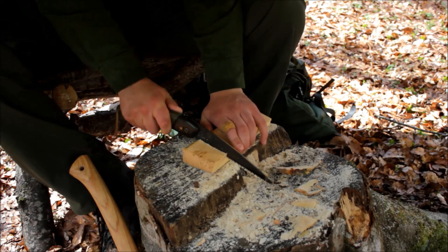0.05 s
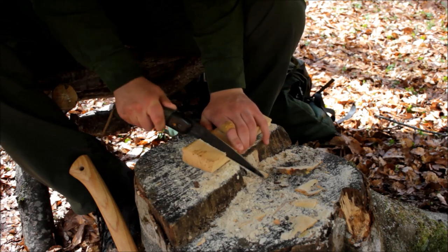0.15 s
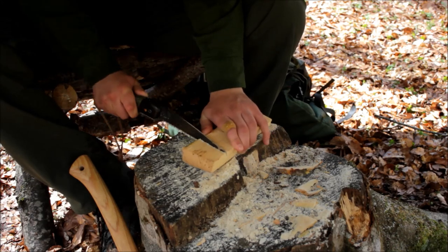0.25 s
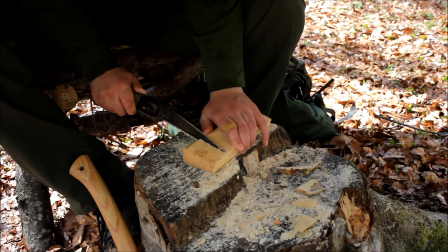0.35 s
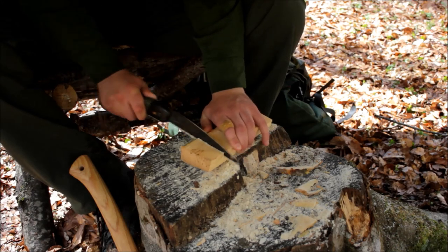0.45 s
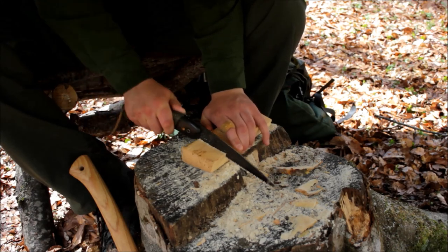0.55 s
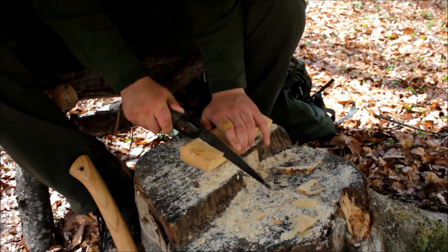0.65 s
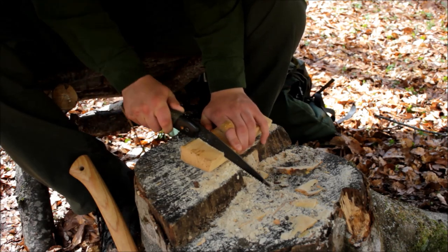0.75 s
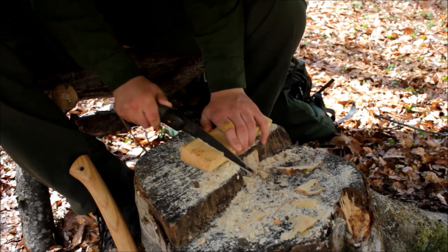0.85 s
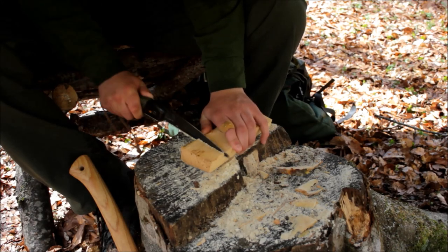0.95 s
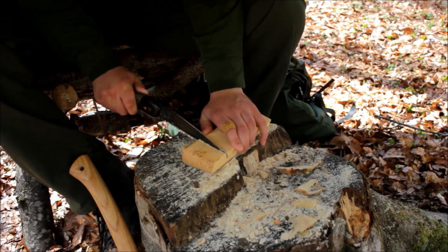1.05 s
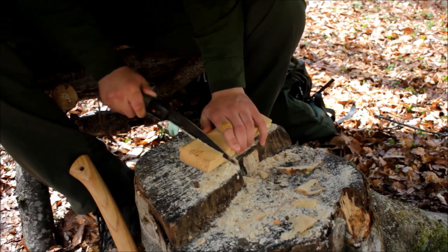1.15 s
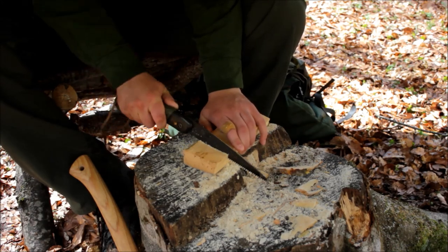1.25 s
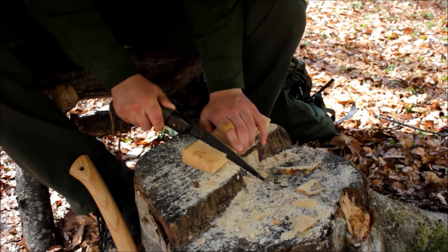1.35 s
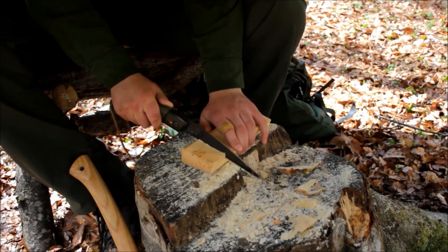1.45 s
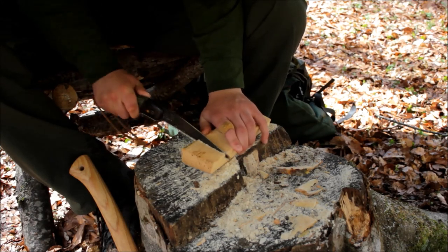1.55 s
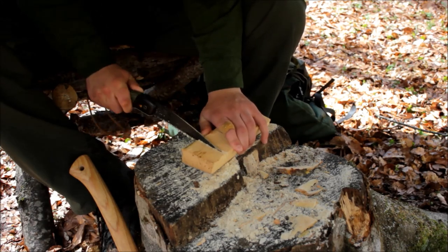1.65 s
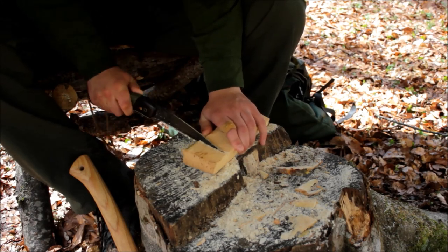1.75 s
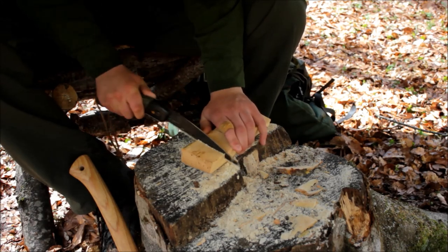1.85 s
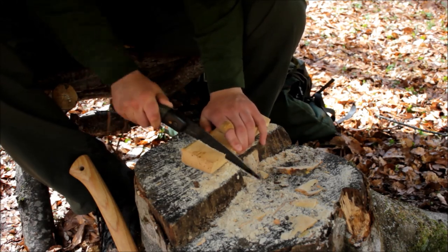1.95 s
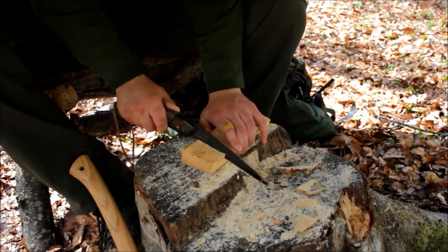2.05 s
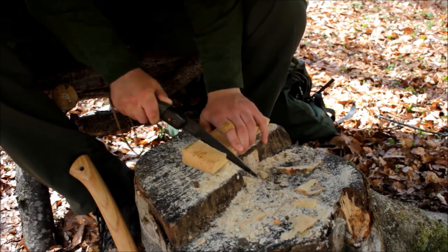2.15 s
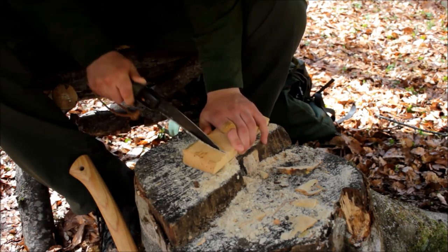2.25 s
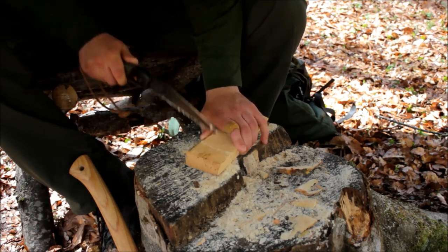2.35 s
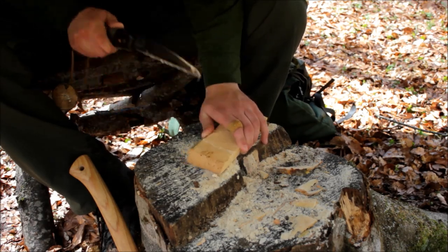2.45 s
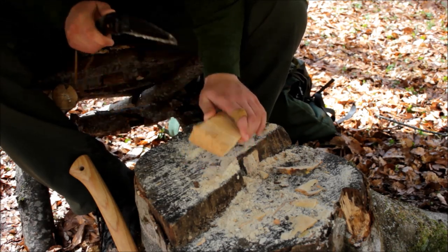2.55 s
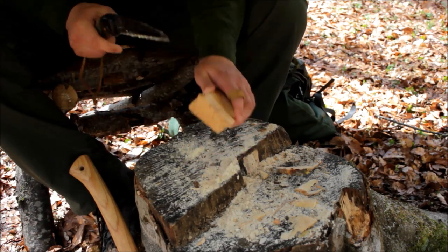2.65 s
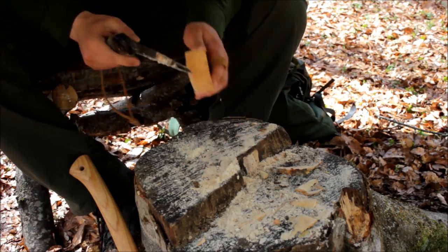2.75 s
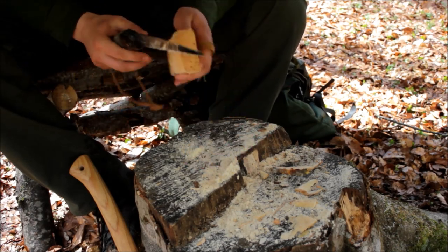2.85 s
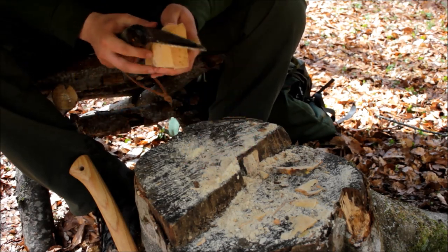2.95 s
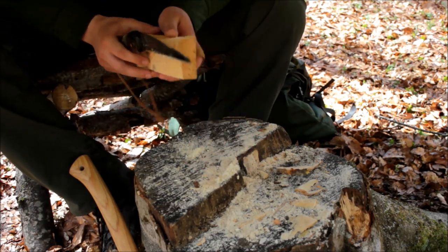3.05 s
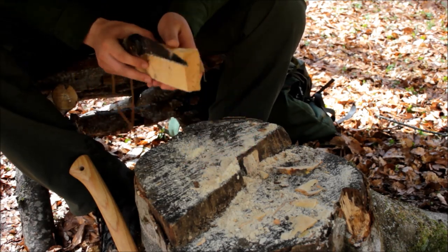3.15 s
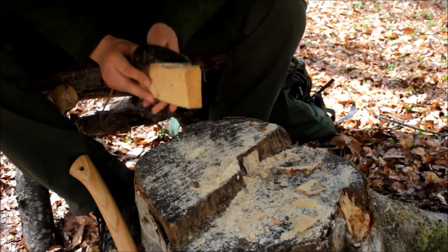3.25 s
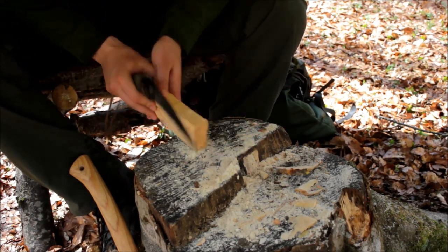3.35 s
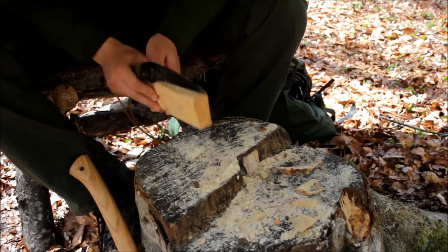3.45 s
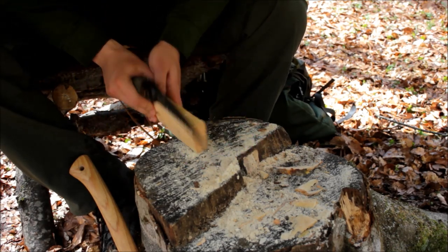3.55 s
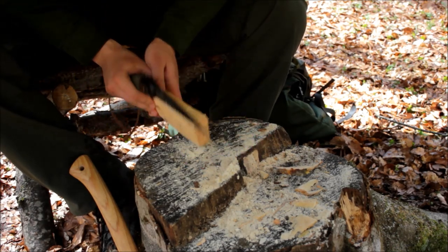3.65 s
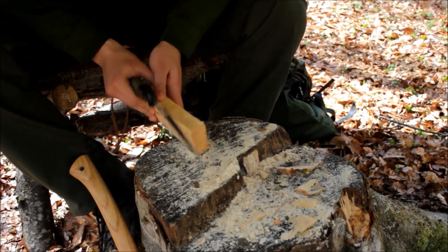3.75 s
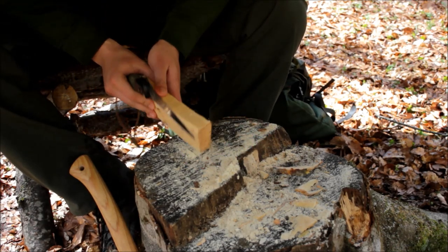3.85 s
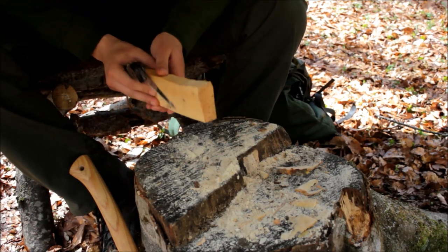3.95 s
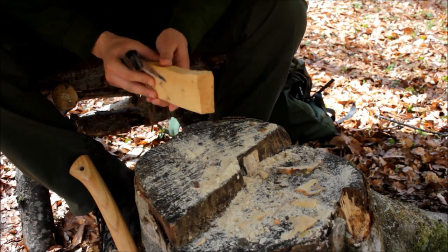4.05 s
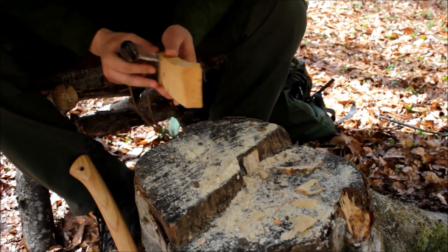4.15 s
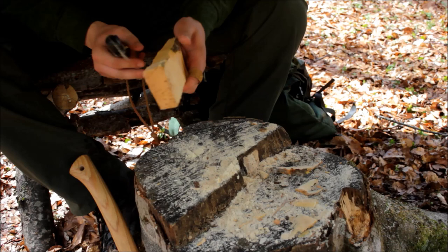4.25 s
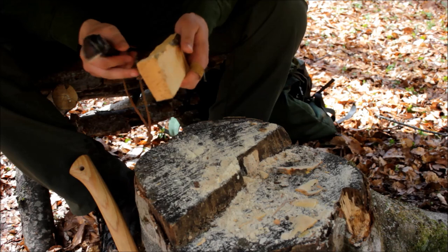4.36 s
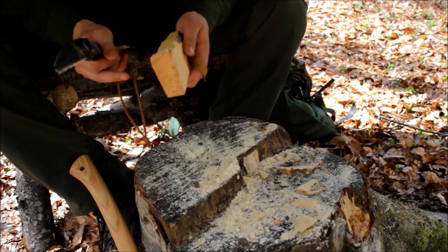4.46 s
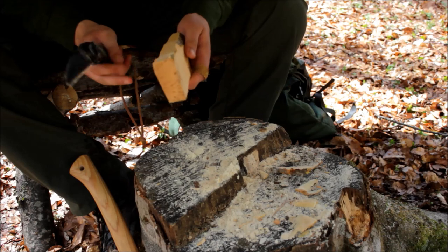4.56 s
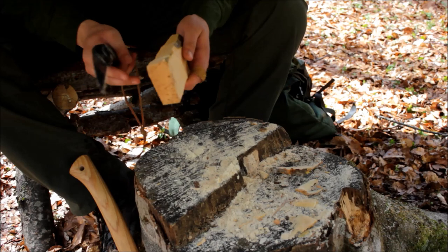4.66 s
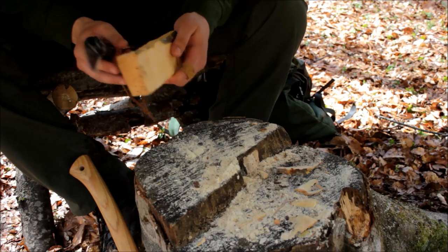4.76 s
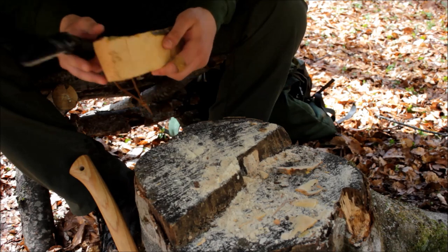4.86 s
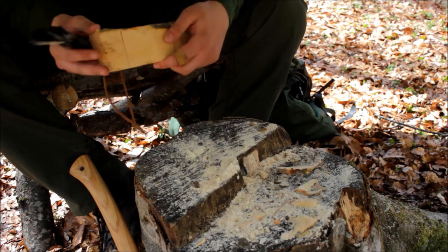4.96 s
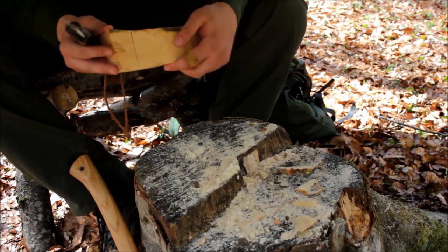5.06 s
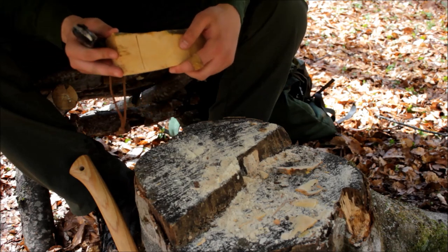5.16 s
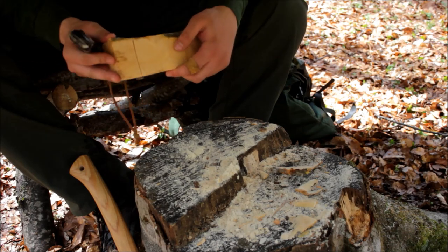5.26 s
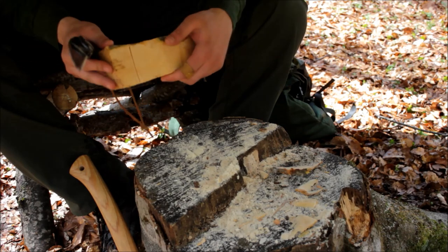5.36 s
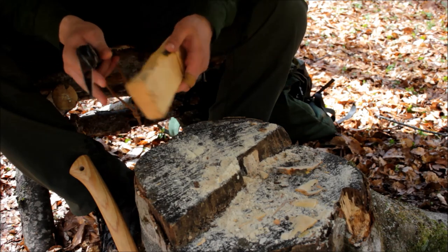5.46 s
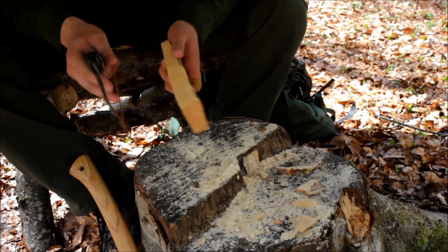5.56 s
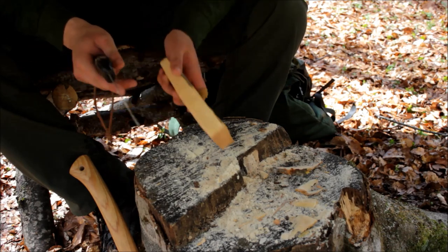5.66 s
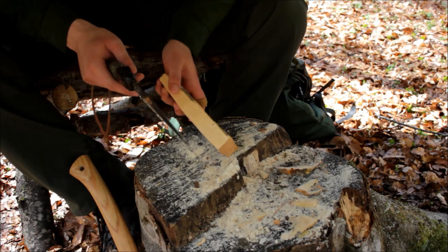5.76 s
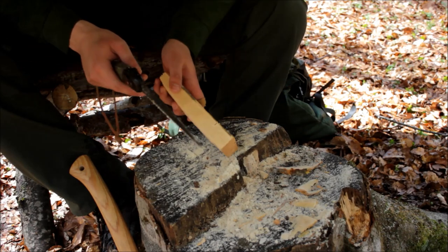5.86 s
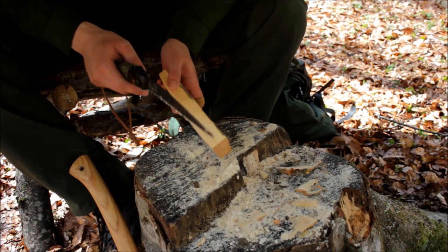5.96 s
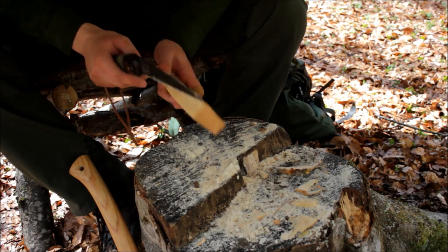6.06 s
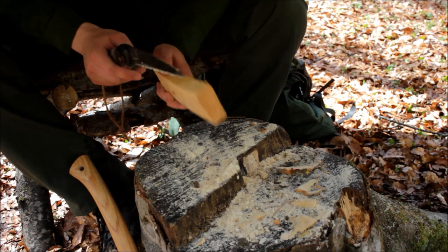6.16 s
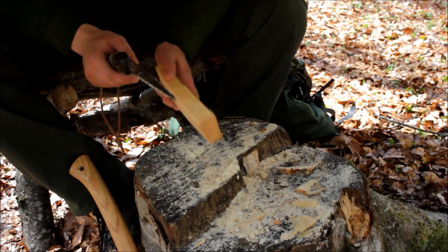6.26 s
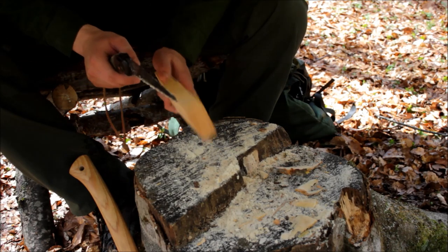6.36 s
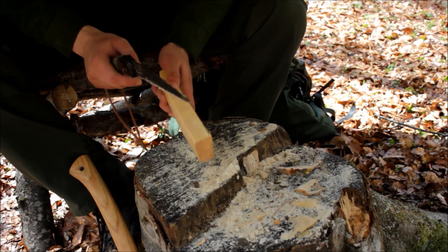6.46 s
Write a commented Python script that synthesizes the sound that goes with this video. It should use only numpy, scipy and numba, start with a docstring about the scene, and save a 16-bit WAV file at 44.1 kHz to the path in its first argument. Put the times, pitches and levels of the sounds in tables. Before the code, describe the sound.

A small hand saw rasps through wood in eight quick strokes, then the block is turned and knocked sharply in a quiet forest.

```python
"""Hand saw in a forest

A small hand saw cuts a wooden blank on a stump: eight quick strokes of noisy tooth bursts through resonances.
The blank is lifted, turned and knocked against the saw: decaying modes, cracks and thumps.
Blade ticks, sleeve rustle and thin whistles are shaped noise; far off a cuckoo calls in two gliding sines.
One close microphone, its gain ducking after the hard knocks."""
import sys
import numpy as np
from scipy import signal
from scipy.fft import rfft, irfft
from scipy.io import wavfile
from scipy.ndimage import uniform_filter1d
from numba import njit

SR = 44100
rng = np.random.default_rng(int(sys.argv[2]) if len(sys.argv) > 2 else 0)


def digitize_waveform(pressure):
    """Quantize a signal to 16-bit integers and store it at the path in sys.argv[1].

    Rows of a 2-D input are taken as channels; values are limited to [-1, 1].
    """
    field = np.atleast_2d(pressure).T
    bounded = np.clip(field, -1, 1)
    quanta = np.round(bounded * 32767).astype(np.int16)
    wavfile.write(sys.argv[1], SR, quanta)


N = 287091
TIME = np.arange(N) / SR
TOP_HZ = 16050


def teeth(speed, full_speed_tooth_hz=1300, scatter_db=2.04, tear_teeth=1.25, chatter_db=0.56):
    """Each tooth catches and tears a burst of fibres of its own size; the blade chatters in the cut."""
    tooth_hz = full_speed_tooth_hz * speed * np.exp(.2 * walk(200))
    passed = np.cumsum(tooth_hz) / SR
    size = undb(scatter_db * rng.standard_normal(N))[passed.astype(int)]
    bursts = size * np.exp(-(passed % 1) / tear_teeth) * rng.standard_normal(N)
    return unit(bursts) * undb(chatter_db * walk(83))


# saw strokes, push and pull in turn: start_s, length_s, fastest_share, pointedness (exponent), level_db,
# fibre_hiss_db, stump_rumble_db, rasp_db, rasp_hz, turn_scrape_db
STROKES = [(-.1, 0.18, 0.63, 1.19, -33.5, -2.5, -12, -6.5, 2400, -62),
           (0.12, 0.21, 0.72, 1.64, -27, 0.5, -19, -5.5, 2680, -55.5),
           (0.386, .24, 0.64, 1.34, -33.5, -4.5, -16, -5, 2560, -69),
           (0.787, .233, .6, 1.25, -29, 0, -18, -7, 2707, -53.5),
           (1.114, .218, .46, 1.47, -34.5, -4.5, -15.5, -10, 2200, -58.5),
           (1.424, .247, .6, 1.2, -32, 1, -16.5, -6.5, 2770, -57.5),
           (1.786, .268, 0.51, .95, -36, -3, -10, -5.5, 2441, -53),
           (2.121, .251, .26, .65, -36, 1.14, -14.5, -3.5, 2502, -56)]
# teeth skip and lose bite: start_s, length_s, lost_share
SKIPS = [(1.863, .035, .5), (2.267, 0.044, .75)]
# blade and blank under the teeth: centre_hz, width_hz, level_db
KERF_MODES = [(1272, 70, 4), (1485, 280, -1), (2250, 145, -3.5), (2360, 45, 10.5), (2754, 340, 6.5),
              (3270, 870, 0.5), (3570, 410, -5), (4370, 220, -4.5), (4528, 52, 10.5), (4750, 890, -2.5),
              (5970, 34, -3), (6610, 310, -13)]
# thin upper rings of the blade: centre_hz, width_hz, level_db
BLADE_MODES = [(7100, 170, -16), (8080, 110, 3), (10500, 170, -9), (11000, 100, 4), (11440, 370, 3),
               (13400, 300, -23), (13700, 350, 5)]
# wandering bands of ground sawdust: centre_hz, width_hz, level_db
GRIT_BANDS = [(1415, 370, -1.5), (2000, 540, -4), (2880, 910, 1), (3620, 1000, -3), (4610, 280, 1.5),
              (5970, 1100, -2.5)]
# range the grinding covers: freq_hz, level_db
GRIT_RANGE = [(800, -8.5), (1250, 2.5), (8000, -1.5)]
# fibre hiss spectrum: freq_hz, level_db (per Hz)
FIBRE_SPECTRUM = [(800, -25), (1300, -21), (3000, -3), (5500, 6.5), (7300, 7.5), (8800, 7), (10000, 5.5),
                  (13000, 9), (18000, -3.5)]
# stump rumble spectra, push and pull: freq_hz, level_db (per Hz)
STUMP_PUSH = [(50, -39.5), (120, -8), (200, -6.5), (270, 3), (400, 4), (620, -2.5), (760, -4), (1100, -1.5)]
STUMP_PULL = [(50, -61), (120, -20), (200, -10.5), (330, -7), (500, -7.5), (620, -4.5), (760, -12),
              (1100, -4.5)]
HISS_POWER, RUMBLE_POWER = 1, 0.52  # exponents on the bite
RASP_OCTAVES = -0.27  # fall along each stroke
LIFT_S = .15  # the blade leaves the cut after the last stroke


def saw(wood_db=-3.0, rasp_width_hz=380, hiss_db=-0.15, ring_db=-11, push_db=0.5, pull_db=1.5,
        grit_db=-4, bite_db=1.48, scrape_hiss_db=-4, scrape_wood_db=-8):
    """Teeth ring blade and blank, a rasp glides with the blade's free length, fibres hiss, the stump rumbles."""
    start, length, _, _, db, fibre_db, rumble_db, rasp_db, rasp_hz, scrape_db = np.transpose(STROKES)
    end = start + length
    stroke = np.searchsorted((end[:-1] + start[1:]) / 2, TIME)

    def held(column):
        """Each stroke's setting over time, smoothed at the changes."""
        return uniform_filter1d(1. * column[stroke], size=600)

    strokes = sum(arch(s, span, peak) ** point for s, span, peak, point, *_ in STROKES)
    lost_bite = sum(lost * arch(s, span, 1 / 2) for s, span, lost in SKIPS)
    bite = strokes * undb(bite_db * walk(45)) * (1 - lost_bite)
    # a louder stroke is a faster one
    speed = np.cbrt(undb(held(db) - db.max()) * bite + .02)
    force = teeth(speed)

    pulling = held(np.arange(len(STROKES)) % 2)
    push_rumble = undb(push_db) * (1 - pulling) * colour(force, STUMP_PUSH)
    pull_rumble = undb(pull_db) * pulling * colour(force, STUMP_PULL)
    stump = push_rumble + pull_rumble
    kerf = resonate(force, KERF_MODES, drift=0.023, swell_db=3.5)

    # rasp, hiss, rings and grit each set in a moment after the catch: 40-sample steps
    rasp_force, torn, steel, ground = (np.roll(force, 40 * k) for k in (1, 2, 3, 4))
    travel = np.clip((TIME - start[stroke]) / length[stroke], 0, 1)
    rasp_centre_hz = held(rasp_hz) * 2 ** (RASP_OCTAVES * (travel - 1 / 2))
    rasp = unit(band(rasp_force, rasp_centre_hz, float(rasp_width_hz)))
    grit = colour(resonate(ground, GRIT_BANDS, drift=0.058, swell_db=3.5), GRIT_RANGE)
    rings = resonate(steel, BLADE_MODES, drift=0.0092, swell_db=-2.5)
    wood = undb(wood_db) * kerf + undb(held(rasp_db)) * rasp + undb(grit_db) * grit
    fibres = undb(hiss_db) * colour(torn, FIBRE_SPECTRUM) + undb(ring_db) * rings

    cut = bite * wood
    cut = cut + bite ** HISS_POWER * undb(held(fibre_db)) * fibres
    cut = cut + bite ** RUMBLE_POWER * undb(held(rumble_db)) * stump

    # at the turns the blade only slides on sawdust
    turn_s = (end + np.append(start[1:], end[-1])) / 2
    in_cut = np.interp(TIME, [end[-1], end[-1] + LIFT_S], [1, 0])
    resting = undb(np.interp(TIME, turn_s, scrape_db)) * in_cut
    scrape = grit + undb(scrape_hiss_db) * fibres + undb(scrape_wood_db) * kerf
    return undb(held(db)) * cut + resting * scrape


# hollow notes as a stroke runs out and the saw is lifted: start_s, length_s, start_hz, level_db
SLIDES = [(0.243, 0.13, 700, -55.5), (0.937, .13, 716, -50.5), (2.309, 0.19, 870, -54),
          (2.552, 0.24, 670, -57.5)]
SLIDE_OCTAVES = -0.73


def slides(width_hz=330):
    """Hollow notes that all fall by the same interval: noise in one gliding resonance."""
    return sum(glide(s, length, hz, SLIDE_OCTAVES, db, width_hz) for s, length, hz, db in SLIDES)


# modes of the blank: freq_hz, t60_s, face_db, edge_db (by where it is struck)
BLANK_MODES = [(240, 0.11, -30, -27), (407, 0.031, -29, -22.5), (508, 0.038, -22.5, -18.5),
               (654, 0.017, -7.5, -15), (960, .025, -22.5, -4), (1049, 0.033, -20.5, -6),
               (1233, 0.035, -24, -3.5), (1340, 0.023, -7, -0.5), (1414, 0.029, 0, -41.5),
               (1560, 0.02, -9.5, -22), (1740, .04, -6.5, -18), (1950, 0.016, -12, -7),
               (2335, .025, -2.5, -25), (2404, .05, -19.5, -8), (3238, 0.024, 3, -8.5),
               (3223, 0.018, -12, -19.5), (3640, 0.036, -9.5, -3), (5350, 0.056, -27, -27.5)]
# blank against saw and hand: start_s, level_db, edge_share (0 face, 1 edge), contact_cutoff_hz,
# crack_db, thump_db, thump_hz
KNOCKS = [(3.386, -11, 0.53, 1440, -13, -4.5, 418), (3.5953, -1.5, 0.13, 4340, -11, -8.5, 341),
          (3.7996, -5, 0, 3700, -10, -31, 70), (4.1074, -34, 1, 900, -9, 3, 280),
          (5.626, -61, 0.46, 3620, -5, -3.5, 237), (5.727, -51, 0.47, 5000, -8, 20, 290),
          (6.2374, -11, 0.55, 2730, -8, -8, 237), (6.4233, -8, 0.97, 2660, -0.5, -37, 240)]
# crack spectrum: freq_hz, level_db (per Hz)
CRACK_SPECTRUM = [(80, -20.5), (300, 2), (1200, 10), (3000, 3.5), (4500, -6), (6500, -6.5), (9000, -9.5),
                  (15500, -17.5)]


def knocks(crack_t60_s=0.02, tail_db=-14, tail_t60_s=0.071, rise_s=0.00046, radiate_hz=240,
           thump_t60_s=0.022, thump_rise_s=0.0041):
    """A blow rings the blank by where it lands; a soft contact dulls it; the hands take a short thump."""
    out = np.zeros(N)
    t = np.arange(SR // 2) / SR
    crack_noise = noise(CRACK_SPECTRUM)
    crack_decay = fade(t, crack_t60_s) + undb(tail_db) * fade(t, tail_t60_s)
    for s, db, edge, contact_hz, crack_db, thump_db, thump_hz in KNOCKS:
        ring = 0
        for k, (hz, t60, face_db, edge_db) in enumerate(BLANK_MODES):
            mode_db = face_db + edge * (edge_db - face_db)
            sign = (-1) ** (k // 3)
            ring = ring + sign * undb(mode_db) * fade(t, t60) * np.sin(2 * np.pi * hz * t)
        ring = signal.lfilter(*signal.butter(1, contact_hz, fs=SR), ring)
        crack = np.roll(crack_noise, rng.integers(N))[:len(t)] * crack_decay
        blow = (1 - np.exp(-t / rise_s)) * (ring + undb(crack_db) * crack)
        # a small block radiates little bass
        blow = signal.lfilter(*signal.butter(2, radiate_hz, "high", fs=SR), blow)
        thump_envelope = (1 - np.exp(-t / thump_rise_s)) * fade(t, thump_t60_s)
        thump = undb(thump_db) * thump_envelope * np.sin(2 * np.pi * thump_hz * t)
        add(out, s, undb(db) * (blow + thump))
    return out


# ticks and rattles of blade and handle: start_s, level_db, treble_db, thud_db, t60_s
TICKS = [(0.142, -33.5, -9, -20, 0.041), (.386, -29.5, -9, -12, 0.0095), (.698, -56.5, 3.5, -8, 0.27),
         (.794, -43, 2, -14, 0.065), (1.111, -41, 5.5, -10, 0.034), (1.141, -42, 9, -23, 0.034),
         (1.419, -38.5, -19, -11, 0.013), (1.726, -39.5, -12, -12, .011), (2.132, -42, 0, -12, 0.023),
         (2.293, -33.5, 8, -20, 0.028), (2.587, -47, -14, -10, 0.05), (2.981, -49, 2, -10, 0.038),
         (3.149, -47.5, -17, -7, 0.026), (3.347, -47, 6, -12, 0.025), (3.4058, -28, -6, -11.5, 0.055),
         (3.4375, -40.5, 6, -15, 0.026), (3.4874, -30, -3.5, -23, 0.029), (3.5079, -35.5, -1.5, -34, 0.05),
         (3.6203, -30, -3, -16, .069), (3.703, -34.5, -6.5, -30, 0.091), (3.771, -49.5, 3, -3, 0.072),
         (3.821, -27, -9, -12.5, 0.045), (4.109, -40, 5.5, 1.5, 0.038), (4.431, -46, 4, -1, 0.012),
         (4.486, -49, -2, 1, 0.023), (4.589, -64, 16.5, -18, 0.072), (4.739, -51, -4, -14, .021),
         (4.776, -48.5, -1, -11, 0.023), (5.058, -57, 2.5, -12, .055), (5.267, -51, -5, -4.5, 0.078),
         (5.624, -46.5, -3, -4.5, 0.16), (5.725, -47.5, 4, 2.5, 0.065), (5.975, -42, -3, -12.5, 0.092),
         (6.042, -46.5, 2, -1, 0.26), (6.445, -31, -29, -6, 0.03)]
# tick spectra, ring, treble and thud: freq_hz, level_db (per Hz)
TICK_RING = [(750, -23), (1200, 0), (1850, 0.5), (2450, 3), (3100, 1), (4500, -9.5), (7000, -21)]
TICK_TREBLE = [(2000, -30.5), (4500, 3), (8000, -1), (16000, 0.5)]
TICK_THUD = [(60, -27.5), (230, -2.5), (500, -4.5), (900, -4), (1800, -25.5)]
# faint ticks at random while the blank is turned over
FAINT_FROM_S, FAINT_TO_S = 2.5, 8
FAINT_DB, FAINT_SPREAD_DB, FAINT_THUD_DB, FAINT_T60_S = -52, 2.5, -5, .03


def ticks(rise_s=0.0004, treble_decay_share=0.87, faint_count=7):
    """Light contacts: a short mid ring, a quicker bright edge and a thud through the hand."""
    out = np.zeros(N)
    t = np.arange(SR // 5) / SR
    parts = np.array([noise(TICK_RING), noise(TICK_TREBLE), noise(TICK_THUD)])
    faint = []
    for when, size in rng.random((faint_count, 2)):
        # draws past the end land on the last sample
        s = min(FAINT_FROM_S + when * (FAINT_TO_S - FAINT_FROM_S), TIME[-1])
        db = FAINT_DB + FAINT_SPREAD_DB * (2 * size - 1)
        faint.append((s, db, 0, FAINT_THUD_DB, FAINT_T60_S))
    for s, db, treble_db, thud_db, t60 in TICKS + faint:
        i = rng.integers(N - len(t))
        ring, treble, thud = parts[:, i:i + len(t)]
        body = (ring + undb(thud_db) * thud) * fade(t, t60)
        bright = undb(treble_db) * treble * fade(t, t60 * treble_decay_share)
        add(out, s, undb(db) * (1 - np.exp(-t / rise_s)) * (body + bright))
    return out


# movements of sleeves and hands: start_s, length_s, fullest_share, level_db, swish_db
MOVES = [(2.201, 0.32, .5, -50, -6), (2.477, 0.5, 0.29, -49.5, -11), (2.93, 0.76, 0.44, -54.5, -12.5),
         (4.0, 0.63, 0.26, -59.5, -1), (4.779, 0.36, 0.25, -64.5, -7), (5.33, 0.52, .4, -55.5, -20),
         (5.92, 0.65, 0.3, -57, -5.5)]
MOVE_POINTEDNESS = 0.73  # exponent
# cloth spectrum: freq_hz, level_db (per Hz)
CLOTH_SPECTRUM = [(88, -37), (150, -15), (235, -8.5), (320, -0.5), (400, -8.5), (589, -7.5), (923, -10.5),
                  (1450, -5.5), (1660, -8), (2100, -2), (2700, -5), (3770, -2), (7770, -9), (14800, -11),
                  (16000, -19)]
# sleeve swish spectrum: freq_hz, level_db (per Hz)
SWISH_SPECTRUM = [(4000, -13), (8000, -6), (10000, 3.5), (14500, 1), (16000, -7)]


def sleeves(grain_db=2.0, flicker_db=1):
    """Cloth and skin rub in fine, uneven grains; each movement swells and dies away."""
    def grains():
        """Noise whose level varies finely and more slowly."""
        return rng.standard_normal(N) * undb(grain_db * walk(1500) + flicker_db * walk(35))

    cloth = colour(grains(), CLOTH_SPECTRUM)
    swish = colour(grains(), SWISH_SPECTRUM)
    out = np.zeros(N)
    for s, length, peak, db, swish_db in MOVES:
        swell = arch(s, length, peak) ** MOVE_POINTEDNESS
        out += swell * undb(db) * (cloth + undb(swish_db) * swish)
    return out


# brushes against the steel blade: start_s, length_s, level_db
BRUSHES = [(2.9, .8, -65.5), (3.796, .11, -59), (4.084, 0.11, -57), (4.965, .04, -64), (5.042, .04, -61.5),
           (5.35, 0.7, -71), (6.354, 0.35, -66)]


def blade(ring_hz=2400, width_hz=130):
    """The loose blade's main ring sings faintly as hands and wood brush it."""
    return sum(glide(s, length, ring_hz, 0, db, width_hz) for s, length, db in BRUSHES)


# airy whistles while the saw is moved about: start_s, length_s, start_hz, glide_octaves, level_db
WHISTLES = [(0.983, 0.26, 5023, 0.23, -63), (2.93, 0.46, 4400, .35, -65), (3.43, 0.16, 4440, 0.046, -65),
            (3.76, .08, 4100, 0.24, -51), (3.95, .13, 12400, .35, -65), (4.064, .15, 4600, .22, -65),
            (4.452, 0.18, 14900, -.28, -69.5), (5.26, .13, 12300, .38, -70), (5.87, 0.19, 4040, 0.22, -64),
            (6.1, 0.52, 4230, 0.083, -65)]


def whistles(width_share=.07):
    """Thin, airy glides of noise, each as wide as a fixed share of its starting pitch."""
    return sum(glide(s, length, hz, octaves, db, width_share * hz) for s, length, hz, octaves, db in WHISTLES)


# the cuckoo's two notes: start_s, length_s, pitch_hz, level_db
CUCKOO_NOTES = [(5.974, 0.17, 630, -59), (6.245, 0.216, 580, -56.5)]


def cuckoo(echo_db=-10, echo_t60_s=1.0, scoop_share=.07, scoop_s=0.035):
    """Two nearly pure notes, the second lower, each scooping up to pitch and lingering among the trees."""
    call = 0
    for s, length, hz, db in CUCKOO_NOTES:
        pitch_hz = hz * (1 - scoop_share * np.exp(-np.maximum(TIME - s, 0) / scoop_s))
        tone = np.sqrt(2) * np.sin(2 * np.pi * np.cumsum(pitch_hz) / SR)
        call = call + arch(s, length, 1 / 2) * undb(db) * tone
    trees = rng.standard_normal(SR) * fade(TIME[:SR], echo_t60_s)
    echo = signal.fftconvolve(call, trees / np.linalg.norm(trees))[:N]
    return call + undb(echo_db) * echo


# forest air spectrum: freq_hz, level_db (per Hz)
FOREST_SPECTRUM = [(15, -39), (25, -18), (55, -15), (82, -15), (301, -18), (335, -14.5), (427, -16),
                   (476, -14.5), (936, -16.5), (1070, -17.5), (2550, -19.5), (4030, -20.5), (4370, -20.5),
                   (16000, -30)]


def forest(level_db=-61, sway_db=0.9, drone_hz=56, drone_width_hz=16, drone_db=-76):
    """Still air among the trees as slowly swaying noise, and a faint low drone of narrow-band noise."""
    air = noise(FOREST_SPECTRUM) * undb(level_db + sway_db * walk(1.5))
    drone = band(rng.standard_normal(N), np.full(N, float(drone_hz)), float(drone_width_hz))
    return air + undb(drone_db) * unit(drone)


def glide(s, length, start_hz, octaves, db, width_hz, pointedness=.8):
    """A swell of rubbing noise in one moving resonance, filtered twice."""
    travel = np.clip((TIME - s) / length, 0, 1)
    hz = np.minimum(start_hz * 2 ** (octaves * travel), TOP_HZ)
    rubbed = band(rng.standard_normal(N), hz, float(width_hz))
    rubbed = unit(band(rubbed, hz, float(width_hz)))
    return arch(s, length, 1 / 2) ** pointedness * undb(db) * rubbed


def resonate(x, modes, drift, swell_db):
    """Resonances that drift and swell as the point of contact moves; rms 1."""
    out = 0
    for k, (hz, width, db) in enumerate(modes):
        gain = (-1) ** k * undb(db + swell_db * walk(15))
        out = out + gain * band(x, hz * np.exp(drift * walk(12)), float(width))
    return unit(out)


@njit
def band(x, hz, width):
    """State-variable band-pass whose centre moves; gain 1 at the centre."""
    y, b, low = np.empty(len(x)), 0., 0.
    for i in range(len(x)):
        g, k = np.tan(np.pi * hz[i] / SR), width / hz[i]
        v = (b + g * (x[i] - low)) / (1 + g * (g + k))
        b, low, y[i] = 2 * v - b, low + 2 * g * v, k * v
    return y


def colour(x, points):
    """Shape a sound by a (Hz, dB) spectrum with falling skirts; rms 1."""
    hz, db = np.transpose(points)
    f = np.fft.rfftfreq(len(x), 1 / SR) + 1
    skirts = (np.minimum(f / hz[0], 1) * np.minimum(hz[-1] / f, 1)) ** 2
    gain = undb(np.interp(np.log(f), np.log(hz), db))
    return unit(irfft(rfft(x) * skirts * gain, len(x)))


def noise(points):
    """Noise of a given spectrum."""
    return colour(rng.standard_normal(N), points)


def walk(rate_hz):
    """Random levels, each held 1 / rate_hz and slewed twice; rms 1."""
    k = max(int(SR / rate_hz), 1)
    steps = np.repeat(rng.standard_normal(N // k + 1), k)
    return unit(uniform_filter1d(uniform_filter1d(steps, k), k)[:N])


def arch(s, length, peak):
    """A smooth rise from 0 to 1 and back, highest at the given share of its length."""
    return np.sin(np.pi / 2 * np.interp(TIME, [s, s + length * peak, s + length], [0, 1, 0]))


def fade(t, t60):
    """Exponential decay, 60 dB down at t60."""
    return np.exp(-np.log(1000) * t / t60)


def add(out, s, sound):
    """Mix a sound in at time s."""
    i = int(s * SR)
    out[i:i + len(sound)] += sound[:N - i]


def undb(db):
    """Decibels to gain."""
    return 10 ** (np.asarray(db) / 20)


def unit(x):
    """Scale to rms 1."""
    return x / np.sqrt(np.mean(x ** 2))


def scene():
    """All sources reach one microphone, the same on both channels."""
    cutting = saw() + slides()
    handling = knocks() + ticks() + sleeves() + blade() + whistles()
    mono = cutting + handling + cuckoo() + forest()
    return np.array([mono, mono])


@njit
def gain_control(size, top, attack, release):
    """The gain falls quickly when a peak passes the top and creeps back."""
    gain, g = np.empty(len(size)), 1.
    for i in range(len(size)):
        if size[i] * g > top:
            g += (top / size[i] - g) * attack
        else:
            g += (1 - g) * release
        gain[i] = g
    return gain


def record(dry, top=0.45, attack_s=0.00041, release_s=0.15, ceiling=.68):
    """Gain control ducks after loud knocks, peaks are rounded and the treble above TOP_HZ is cut."""
    held = dry * gain_control(np.abs(dry[0]), float(top), 1 / (attack_s * SR), 1 / (release_s * SR))
    rounded = ceiling * np.tanh(held / ceiling)
    return signal.sosfilt(signal.ellip(10, .2, 80, TOP_HZ, fs=SR, output="sos"), rounded)


dry = scene()
out = record(dry)
digitize_waveform(out)
```